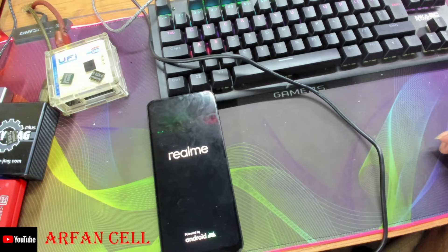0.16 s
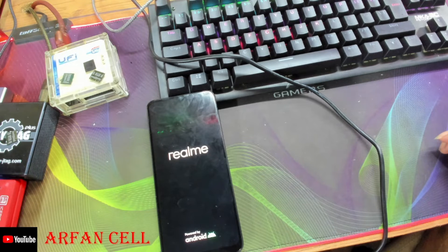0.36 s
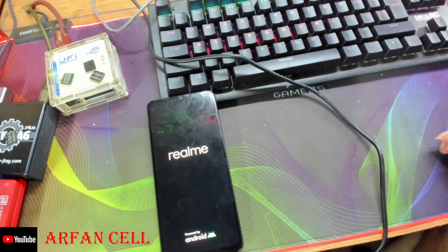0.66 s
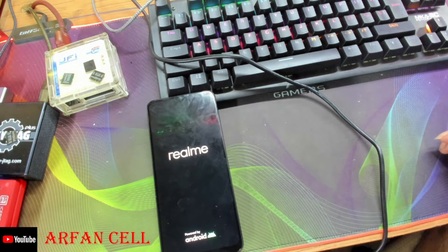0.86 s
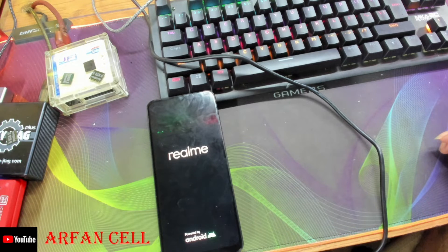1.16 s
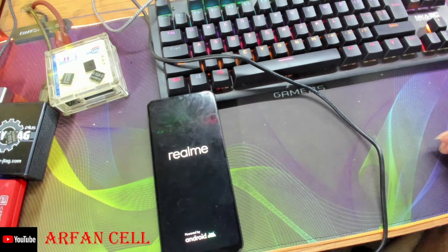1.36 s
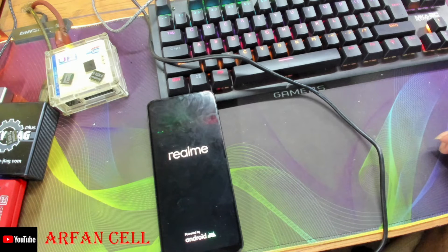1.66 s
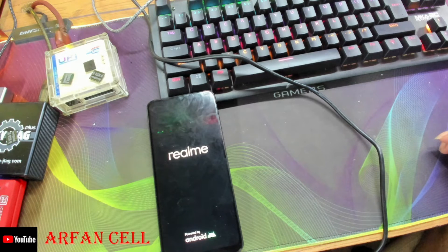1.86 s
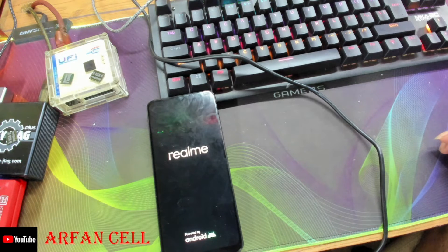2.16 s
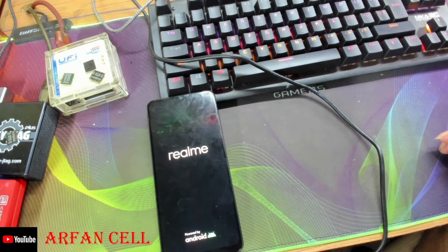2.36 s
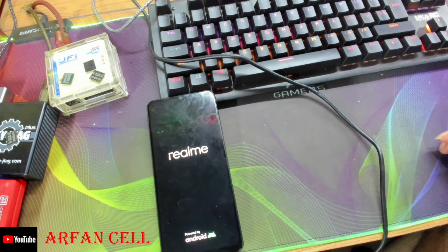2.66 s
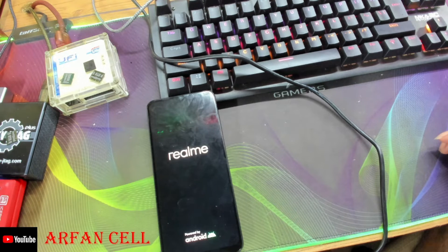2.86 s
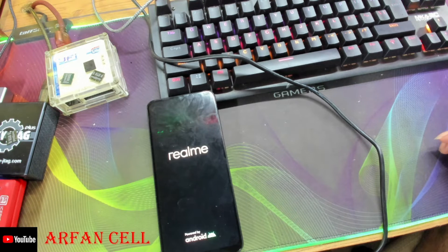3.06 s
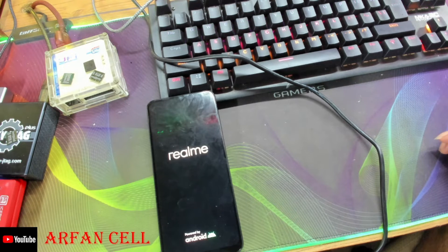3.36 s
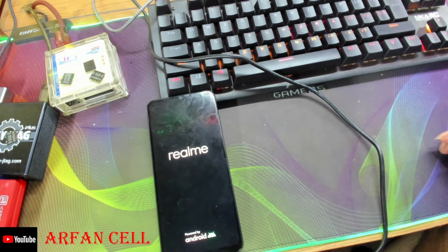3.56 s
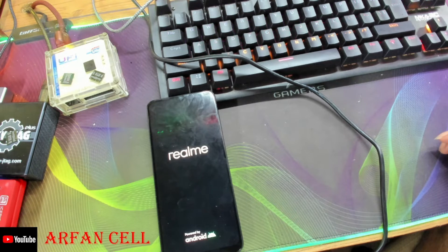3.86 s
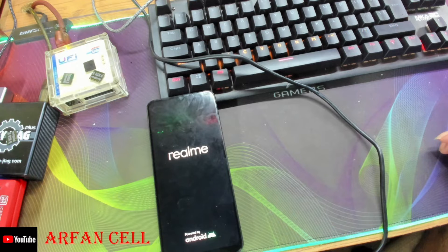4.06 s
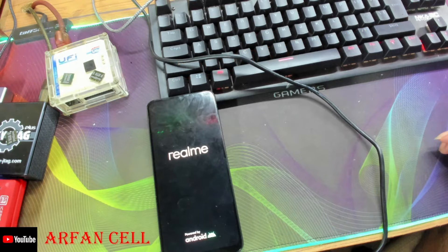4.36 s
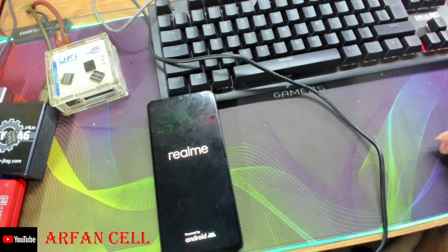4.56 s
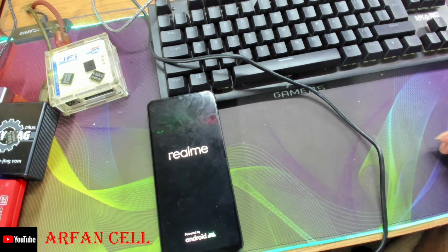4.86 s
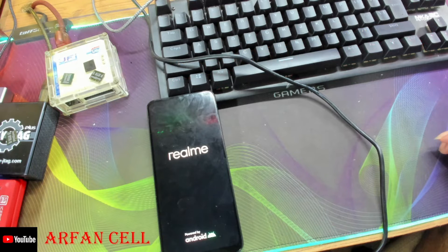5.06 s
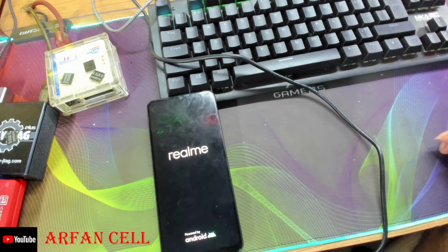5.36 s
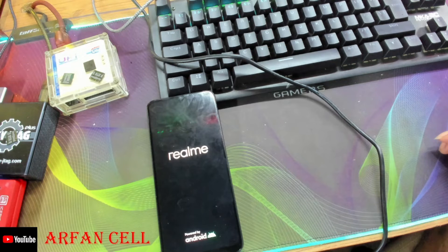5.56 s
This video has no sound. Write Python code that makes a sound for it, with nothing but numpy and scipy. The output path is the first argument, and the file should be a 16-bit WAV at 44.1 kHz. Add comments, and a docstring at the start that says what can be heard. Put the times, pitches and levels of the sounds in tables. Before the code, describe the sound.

Low constant motor hum and airy room noise, captured roughly by one microphone in a workshop. A deep drone slowly sinks in pitch and weakens after two seconds. Around one second a soft thud leads into dull rumbling, which fades before the middle. Later the sound wavers and drops out briefly, then shudders quickly before partly recovering. A barely audible electronic whine sits far above.

```python
"""A small motor hums steadily in a repair workshop, under a rush of air and a thin electronic whine.
Hum and whine are wandering sines; the air is shaped noise that flickers. A deep drone sags evenly in
pitch and falls back in level after two seconds; a soft bump starts about a second of dull noise rumble.
At the one microphone a fast expander roughens the sound, and the level dips and flutters,
most deeply in a spell towards the end. A faint hiss lies beneath."""
import sys
import numpy as np
from scipy import signal
from scipy.fft import rfft, irfft
from scipy.io import wavfile
from scipy.ndimage import uniform_filter1d

SR = 44100
rng = np.random.default_rng(int(sys.argv[2]) if len(sys.argv) > 2 else 0)


def int16_out(signal):
    """Quantize to a 16-bit WAV file."""
    q = np.round(np.clip(np.atleast_2d(signal).T, -1, 1) * 32767)
    wavfile.write(sys.argv[1], SR, q.astype(np.int16))


N = 251370
TIME = np.arange(N) / SR  # s
BIN_HZ = np.arange(N // 2 + 1) * SR / N


def undb(db):
    """Decibels to gain."""
    return 10 ** (np.asarray(db) / 20)


def walk(rate_hz):
    """Smooth chance of spread 1 that moves up to about rate_hz times a second."""
    spectrum = rfft(rng.standard_normal(N)) * np.exp(-(BIN_HZ / rate_hz) ** 2)
    x = irfft(spectrum, N)
    return x / x.std()


def envelope(start, attack, hold, release):
    """Rises from 0 to 1, holds and falls back; all times in seconds."""
    corners = start + np.cumsum([0, attack, hold, release])
    return np.interp(TIME, corners, [0, 1, 1, 0])


def swell(s, half_width):
    """A bell of height 1 around a moment, down to 1/e at half_width seconds."""
    return np.exp(-((TIME - s) / half_width) ** 2)


def trough(offset, length):
    """Shape of a short, round-bottomed dip: 1 at its centre, 1/e at both ends of its length."""
    return np.exp(-np.abs(2 * offset / length) ** 3)


def tone(hz, db):
    """A sine that follows a pitch curve, at an rms level."""
    cycles = np.cumsum(hz) / SR + rng.random()
    return np.sqrt(2) * undb(db) * np.sin(2 * np.pi * cycles)


def lines(table, waver_db):
    """Steady tones, each wandering a little in pitch and level."""
    total = 0
    for hz, db, wander_hz in table:
        pitch = hz + wander_hz * walk(3.27)
        total = total + tone(pitch, db + waver_db * walk(9.1))
    return total


def noise(colour, resonances=()):
    """Noise with a spectrum of (frequency, density) points, lifted around any resonances."""
    hz = np.maximum(BIN_HZ, 1)
    points, levels = np.transpose(colour)
    db = np.interp(np.log(hz), np.log(points), levels)
    for centre, width, lift in resonances:
        db = db + lift * np.exp(-((hz - centre) / width) ** 2)
    return irfft(rfft(rng.standard_normal(N)) * undb(db), N) * np.sqrt(SR / 2)


def motor_hum():
    """The motor's steady lines, sines that hardly move in pitch or level."""
    # lines of the motor: (frequency [Hz], mean level [dB], spread of the pitch wander [Hz])
    hum_lines = [(119.76, -44.5, 0.15), (300.3, -59, 0.13), (320.9, -50, 0.74), (668, -72.5, 1.77),
                 (1124, -69.5, 4.56)]
    return lines(hum_lines, waver_db=0.8)


def drone():
    """A deep, slightly rough tone that sags evenly; a loud stretch, then faint with brief swells."""
    # loud stretch: (start [s], attack [s], hold [s], release [s])
    loud_stretch = (0.062, 0.54, 1.47, 0.29)
    # brief swells: (time [s], half width [s], lift [dB])
    brief_swells = [(2.97, 0.16, 7.5), (4.55, 0.27, 3), (5.559, 0.19, 6.5)]
    start_hz, sag_hz_per_s = 45.52, 1.3
    faint_db, loud_lift_db = -49.5, 7
    waver_db, rough_db = 1.13, 1.45  # spreads of the slow and the quick level changes
    hz = start_hz - sag_hz_per_s * TIME
    db = faint_db + loud_lift_db * envelope(*loud_stretch)
    db = db + sum(lift * swell(s, half_width) for s, half_width, lift in brief_swells)
    return tone(hz + 0.25 * walk(5.7), db + waver_db * walk(3.3) + rough_db * walk(22))


def rumble():
    """Dull, uneven low noise with a few soft bumps; the first and strongest starts it."""
    # course of the rumble: (start [s], attack [s], hold [s], release [s])
    rumble_course = (1.205, 0.089, 0.74, 0.42)
    # spectrum before the gains below: (frequency [Hz], density [dB per Hz])
    rumble_colour = [(20, -110), (110, -72), (155, -71), (188, -59.5), (250, -66), (340, -73), (500, -105),
                     (2000, -150)]
    # soft bumps: (time [s], half width [s], gain on the spectrum [dB])
    soft_bumps = [(1.165, 0.034, 6.5), (1.46, .05, -4.5), (1.66, 0.046, -7), (2.15, 0.038, -9)]
    roll_db, waver_db = -5, 1
    roll = envelope(*rumble_course) * undb(roll_db + waver_db * walk(4))
    bumps = sum(undb(db) * swell(s, half_width) for s, half_width, db in soft_bumps)
    return (bumps + roll) * noise(rumble_colour)


def air_rush():
    """Rush of air in the room: noise that excites resonances and flickers quickly in level."""
    # spectrum before resonances and flicker: (frequency [Hz], density [dB per Hz])
    air_colour = [(5, -77.5), (17, -73), (32, -80), (60, -66), (85, -76.5), (180, -71.5), (350, -76),
                  (420, -79.5), (1100, -86.5), (1650, -93), (2050, -103), (3100, -105.5), (4400, -113),
                  (6300, -114.5), (8000, -118), (11500, -120.5), (15500, -129)]
    # resonances that the air excites: (frequency [Hz], half width to 1/e of the lift [Hz], lift [dB])
    air_resonances = [(111, 9.9, 10.5), (154.6, 9.9, 4), (198, 8.5, 5), (683, 77, 2.5), (920, 17, 3.5),
                      (1690, 164, 3.5), (3654, 340, 8.5), (3740, 55, 2)]
    flicker = undb(0.98 * walk(50) + 0.92 * walk(230))
    return noise(air_colour, air_resonances) * flicker


def electronic_whine():
    """A thin high whine of close, wavering sines."""
    # lines of the whine: (frequency [Hz], mean level [dB], spread of the pitch wander [Hz])
    whine_lines = [(11149, -106, 1.5), (11208, -93, 1.5), (11238, -104, 4), (11268, -99.5, 1.5)]
    return lines(whine_lines, waver_db=3.0)


def microphone_hiss():
    """The even hiss of the microphone, a faint steady noise."""
    # spectrum of the hiss: (frequency [Hz], density [dB per Hz])
    hiss_colour = [(1000, -124), (8000, -129), (15500, -135)]
    return noise(hiss_colour)


def scene():
    """Motor, rumble, air and whine at one microphone."""
    motor = motor_hum() + drone()
    return (motor + air_rush() + rumble() + electronic_whine())[None]


def expander(x, follow_hz, slope):
    """Gain follows the envelope: quiet stretches sink, and beating low tones shake the whole sound."""
    unity_db = -41  # envelope at which the gain is 1
    below_db, above_db = -20, 2.5  # limits of the envelope around it
    smooth = signal.butter(2, follow_hz, fs=SR, output="sos")
    strength = np.abs(signal.sosfiltfilt(smooth, np.abs(x))) / undb(unity_db)
    return x * np.clip(strength, undb(below_db), undb(above_db)) ** slope


def slow_level():
    """Gain of the drawn level curve plus a chance wavering that grows with time."""
    # level of the whole sound: (time [s], level [dB])
    level_points = [(0, 0), (.25, 0.86), (2.1, 1.94), (2.7, 0), (2.85, 3), (3.03, 1), (3.13, -2),
                    (3.55, 0.2), (4.3, .5), (5.17, -2), (5.27, -1), (5.47, -5), (5.65, 1)]
    waver_db_per_s = 0.2636  # growth of the wavering's spread
    seconds, levels = np.transpose(level_points)
    db = np.interp(TIME, seconds, levels)
    return undb(db + waver_db_per_s * TIME * walk(8))


def flutter():
    """Gain of almost evenly spaced troughs, each with its own depth."""
    # spell of deep troughs: (start [s], attack [s], hold [s], release [s])
    deep_spell = (4.47, .04, .7, .04)
    rate_hz, one_trough_s = 25, 4.517  # rate, and the time of one trough
    growth_db_per_s, spell_db = 0.46, 8.5
    depth_scatter = 0.21  # share of the depth
    width_s, jitter_s = 0.02, 0.005  # before the smoothing; jitter is a spread
    cycles = (TIME - one_trough_s) * rate_hz
    nearest = np.round(cycles).astype(int)
    chances = rng.standard_normal((np.ptp(nearest) + 1, 2))  # one pair for each trough
    deeper, later = chances[nearest - nearest[0]].T
    depth = growth_db_per_s * TIME + spell_db * envelope(*deep_spell)
    depth = depth * (1 + depth_scatter * deeper)
    offset = (cycles - nearest) / rate_hz - jitter_s * later
    fall_db = uniform_filter1d(depth * trough(offset, width_s), size=SR // 500)  # 2 ms smoothing
    return undb(-fall_db)


def dips():
    """Gain of the single moments when the level dips briefly."""
    # dips: (time [s], length [s], level change [dB])
    single_dips = [(.039, .046, -4.4), (2.484, .02, -12), (2.58, .017, -6), (2.764, .022, -11),
                   (3.1, .022, -7), (3.159, .02, -6), (3.31, .05, -4), (3.783, .04, -6.5),
                   (3.919, .027, -10), (4.05, .054, -8.4), (4.149, .019, -10), (4.637, .035, -7),
                   (4.76, .035, -7), (4.86, .035, -7), (5.455, .045, -5)]
    return undb(sum(change * trough(TIME - s, length) for s, length, change in single_dips))


def record(dry):
    """The sound is expanded, swells, flutters and dips over a faint hiss, and loses its top."""
    top_hz = 15650
    expanded = expander(dry, follow_hz=119, slope=0.62)
    out = expanded * slow_level() * flutter() * dips() + microphone_hiss()
    soft_ends = np.clip(np.minimum(TIME, TIME[::-1]) / .004, 0, 1)  # 4 ms fades
    low_pass = signal.ellip(10, .2, 70, top_hz, fs=SR, output="sos")
    return signal.sosfilt(low_pass, out * soft_ends)


dry = scene()
out = record(dry)
int16_out(out)
```